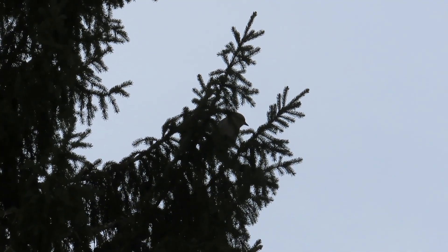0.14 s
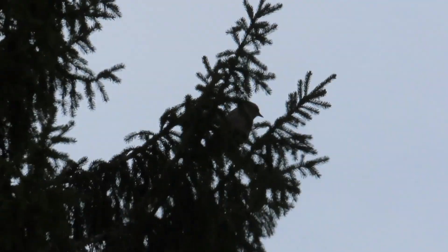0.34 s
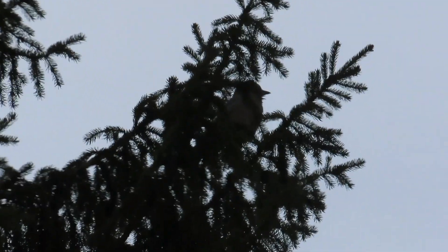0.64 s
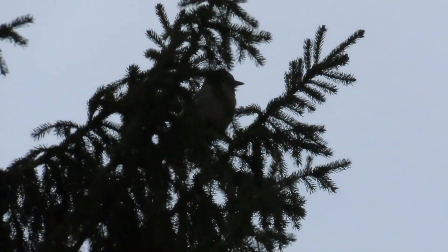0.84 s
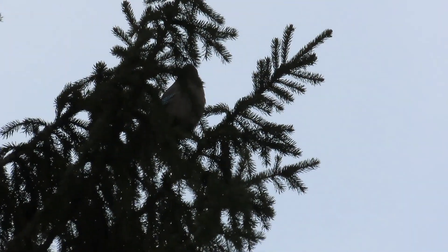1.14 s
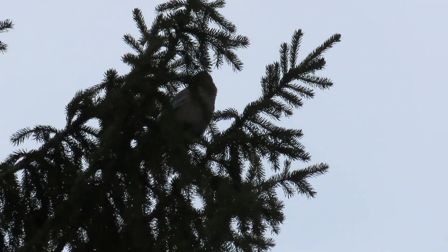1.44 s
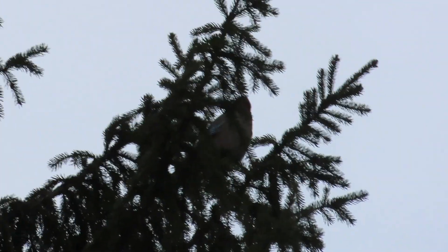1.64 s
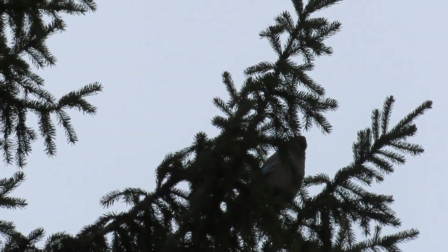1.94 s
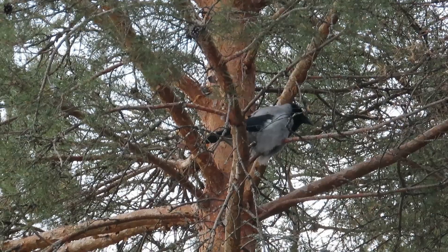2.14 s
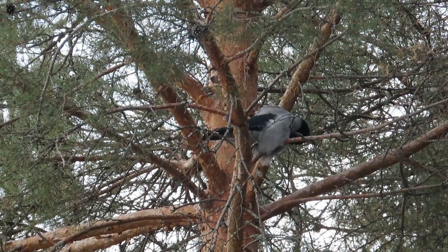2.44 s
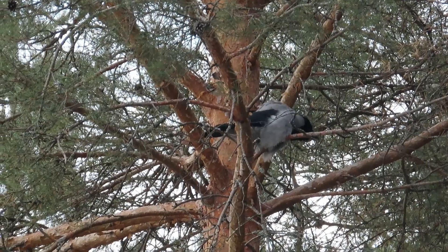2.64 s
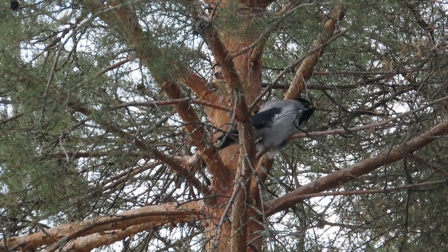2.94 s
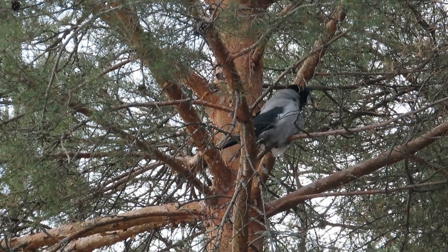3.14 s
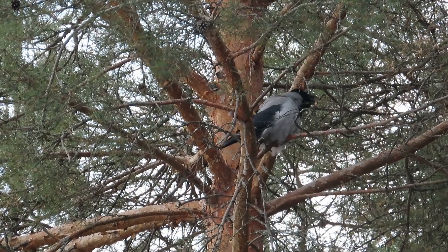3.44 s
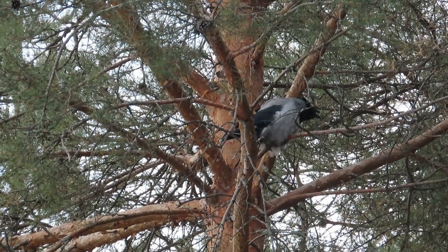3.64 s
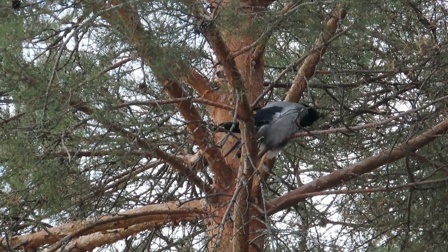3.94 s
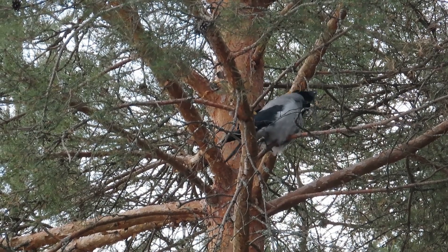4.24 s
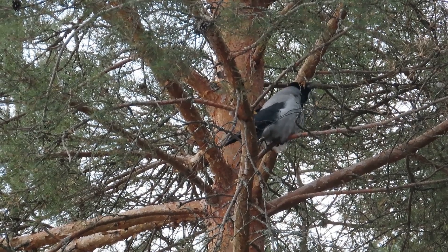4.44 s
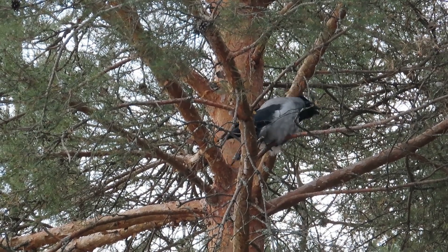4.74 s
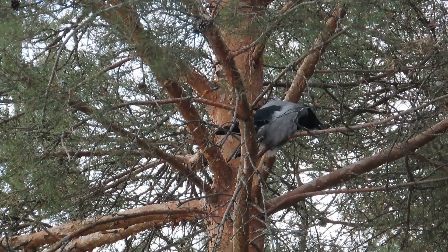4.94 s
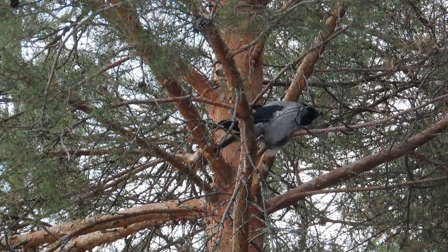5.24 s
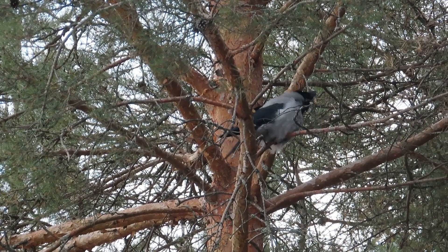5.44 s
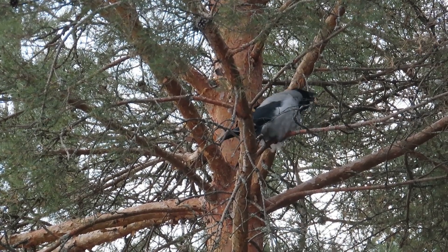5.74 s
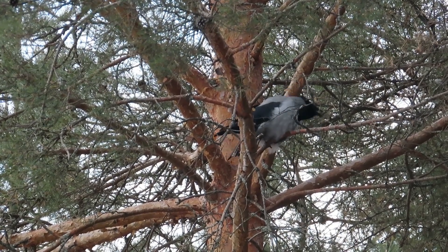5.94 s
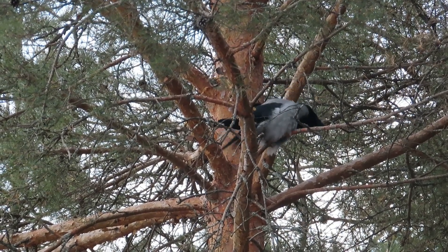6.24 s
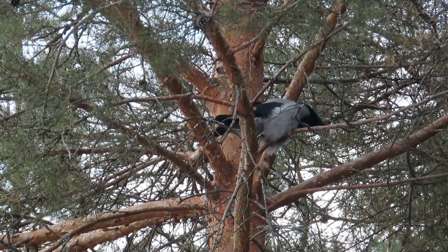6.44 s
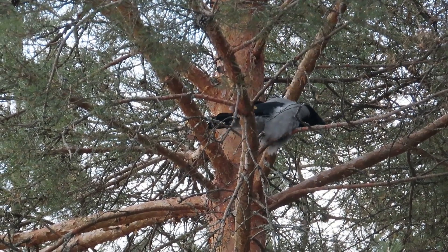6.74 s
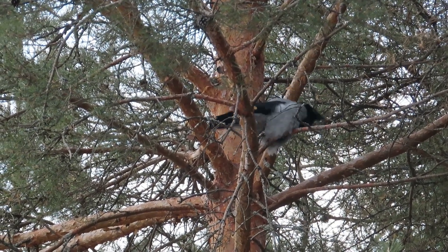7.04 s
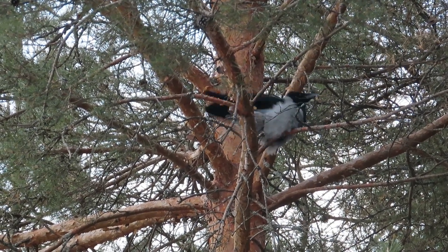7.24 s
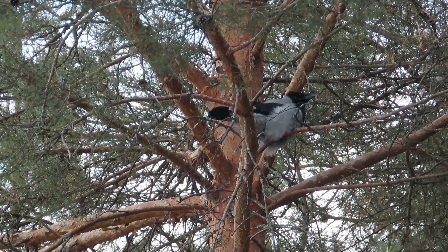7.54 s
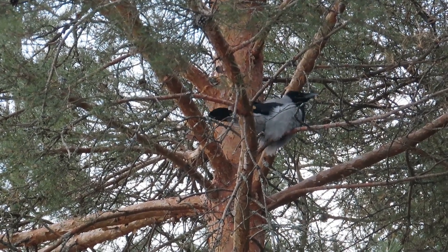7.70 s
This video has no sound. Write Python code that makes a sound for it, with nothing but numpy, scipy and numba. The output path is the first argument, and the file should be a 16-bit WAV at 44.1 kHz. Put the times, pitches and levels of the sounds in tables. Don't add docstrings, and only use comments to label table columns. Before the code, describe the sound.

Three harsh rattling crow caws over a low steady traffic rumble, with faint thin two-note whistles of a small bird in a conifer wood.

```python
import sys
import numpy as np
from scipy import signal
from scipy.fft import rfft, irfft, next_fast_len
from scipy.io import wavfile
from scipy.ndimage import uniform_filter1d
from numba import njit

SR = 44100
rng = np.random.default_rng(int(sys.argv[2]) if len(sys.argv) > 2 else 0)


def inscribe(sig):
    pcm = np.round(np.clip(np.atleast_2d(sig).T, -1, 1) * 32767)
    wavfile.write(sys.argv[1], SR, pcm.astype(np.int16))


def to_linear_factor(level_db):
    exponent = np.asarray(level_db, float) / 20
    return 10 ** exponent


N = 347067

# full voice in seconds, hold in seconds, level in dB, speed of the beak gesture.
CAWS = [
    (3.341, .55, -33.5, 0.96),
    (4.528, 0.55, -33.5, 0.95),
    (5.69, .59, -34, 1.22),
]
# seconds from full voice, beak opening 0-1, main throat resonance in Hz.
BEAK = [(-.035, .3, 960), (0, 0.71, 1133), (.05, 0.98, 1210), (.14, 1, 1350), (.21, .68, 1325),
        (.34, 0.28, 1235), (.6, 0.16, 1230)]
# seconds from start, period in ms.
FLAP_PERIOD = [(0, 17.8), (.17, 17.7), (.24, 15.6), (.35, 17.6), (.47, 20.4), (.68, 22)]
# centre in Hz, width in Hz.
OPEN_RING = (2500, 260)
# Hz with beak open, Hz closed, width in Hz.
CLOSED_RING = (2750, 3250, 200)
# Hz open, Hz closed, width in Hz, dB open, dB closed.
SLIDING_RINGS = [(916, 730, 238, -2, -11), (600, 478, 88, -8, -14), (1836, 1910, 250, -10.5, -37),
                 (1493, 1620, 175, -1, -34), (2050, 1760, 420, -12, -60)]
# centre in Hz, width in Hz, level in dB.
BREATH_BANDS = [(5300, 220, 8), (5470, 3400, 16), (6200, 300, 4), (4300, 600, 6), (8350, 4300, -8)]
# dB closed, dB open.
OPEN_RING_DB = (-38.5, -13)
CLOSED_RING_DB = (-20, -37.5)
BREATH_DB = (-49.5, -28.5)
# delay in ms, level in dB.
BOUNCES = [(17.7, -8.5), (4.4, -15)]
VOICE_HZ = 305.6
SCOOP_SHARE, SCOOP_S = .24, .014
ATTACK_S, ATTACK_DB, RELEASE_S, RELEASE_DB, SAG_DB_PER_S = .036, -27, .081, -23, -3.5

# start in seconds, level in dB, dB at the start of the slide, pitch ratio.
HIGH_NOTES = [
    (3.338, -55, -60, 1.04),
    (3.771, -51, -1.5, .995),
    (4.216, -48, -8, 1.001),
]
GRACE_NOTES = [
    (3.759, -53, -5, 1.001),
    (4.205, -52, -5, 1.001),
]
LOW_NOTES = [
    (3.51, -50, 0, 1),
    (3.935, -50, -1.5, 1.015),
    (4.387, -47, -2, 1.012),
]
# Hz from, Hz to, then slide middle, slide time, settling time and length in seconds.
HIGH_SHAPE = (7800, 4350, .013, 0.0051, 0.016, 0.11)
GRACE_SHAPE = (5800, 6800, .008, .004, .01, .019)
LOW_SHAPE = (5300, 3570, .034, 0.0061, 0.027, 0.166)
TIT_SETTLE_SHARE, TIT_EDGE_DB = .3, -17
TIT_ATTACK_S, TIT_RELEASE_S, TIT_HOOK_HZ = .008, .012, 350
TIT_PAN_DB, CROW_PAN_DB = -4.3, -1.5

# start in seconds, length in seconds, Hz at start, Hz at end, level in dB.
FAR_NOTES = [(1.123, 0.046, 4620, 4720, -68), (1.19, 0.13, 3060, 4050, -64.5),
             (1.33, 0.035, 2980, 2920, -64), (1.44, .025, 3700, 3200, -68), (1.488, 0.025, 3290, 3030, -61),
             (1.644, 0.045, 3130, 3940, -67), (1.715, 0.092, 4500, 4080, -66.5),
             (2.165, 0.04, 5600, 5130, -73), (2.45, .04, 4300, 4400, -69), (2.477, 0.079, 3080, 3170, -67),
             (2.866, 0.038, 1944, 1810, -53.5), (5.96, 0.051, 4350, 4220, -61.5),
             (5.982, .06, 3900, 3830, -68), (6.49, 0.058, 3050, 2900, -71), (6.551, 0.055, 6380, 6330, -73),
             (6.602, 0.075, 4680, 3900, -72), (6.754, 0.046, 923, 870, -61)]
FAR_BEND_SHARE = .72
WOOD_T60_S, WOOD_TOP_HZ, WOOD_RISE_S, WOOD_DB = 1.09, 4920, .0147, -13.5

# start in seconds, peak in dB, ring in Hz, decay (T60) in seconds.
TICKS = [
    (0.51, -34, 850, 0.016),
    (.513, -47, 1730, 0.045),
    (0.601, -41, 840, 0.032),
    (.812, -52, 5300, 0.034),
    (1.269, -38.5, 795, 0.056),
    (7.535, -58, 13000, .01),
]
# centre in Hz, width in Hz, peak in dB.
HOUSING = (852, 227, 6.5)

# Hz, dB per Hz.
COLOUR_1 = [(15, -44), (25, -13), (43, -17), (59, -6), (77, -3.5), (93, -10), (113, -4), (198, -5),
            (227, -1), (614, -17), (871, -18), (1410, -24.5), (4150, -31), (15500, -49)]
COLOUR_2 = [(15, -55), (25, -23), (55, -15.5), (122, -2), (215, 0), (378, -10.5), (445, -18.5),
            (762, -26.5), (895, -19), (1020, -27), (1850, -31), (2010, -32), (4260, -36.5), (15500, -54)]
# Hz, dB.
SIDE_1 = [(60, -20), (110, -11.5), (200, -13.5), (380, -4), (700, -13), (1290, -5.5), (2380, -3),
          (4400, -7), (8120, -7.5), (15000, -3)]
SIDE_2 = [(60, -23), (110, -17), (200, -22.5), (380, -5), (700, -9.5), (1290, -2.5), (2380, -1), (4400, -3),
          (8120, -5.5), (15000, -4)]
TRAFFIC = [(0, -57.5), (.08, -53), (.3, -55.5), (.5, -60.5), (.86, -62), (1.05, -52.5), (1.35, -51),
           (1.93, -53.5)]
ROAD = [(2.1, 1), (2.6, -0.5), (4.2, 2.2), (6.4, -0.6), (7.2, 2.5), (7.87, 0)]
# Hz, share.
TRAFFIC_SHARES = [(420, -0.029), (650, 0.8), (1000, 1), (2000, -0.065)]
ROAD_SHARES = [(500, -0.16), (1900, 0.91), (5000, -0.11)]
BACKGROUND_1_DB, BACKGROUND_2_DB = -43.5, -40
DRONE_HZ, DRONE_RISE_HZ_PER_S, DRONE_DB, DRONE_RISE_DB_PER_S = 61, 1.24, -53, 1.4

CUT_S, START_S, FADE_S = 1.939, 2.072, .045
MIC_TOP_HZ = 12800


def level(x, db):
    return x * to_linear_factor(db) / np.sqrt(np.mean(x ** 2))


def walk(rate_hz, size):
    place = np.arange(size) * rate_hz / SR
    k, part = place.astype(int), place % 1
    part = part * part * (3 - 2 * part)
    levels = rng.standard_normal(size // 64)
    return 1.193 * (levels[k] * (1 - part) + levels[k + 1] * part)


@njit
def bandpass(x, hz, width_hz):
    y, band, low = np.empty(len(x)), 0., 0.
    for i in range(len(x)):
        g, k = np.tan(np.pi * hz[i] / SR), width_hz / hz[i]
        v = (band + g * (x[i] - low)) / (1 + g * (g + k))
        band, low, y[i] = 2 * v - band, low + 2 * g * v, k * v
    return y


def ring(x, hz, width_hz):
    hz = hz + np.zeros(len(x))
    return bandpass(bandpass(x, hz, 1. * width_hz), hz, 1. * width_hz)


def add(track, x, s):
    i = int(s * SR)
    track[..., i:i + x.shape[-1]] += x[..., :N - i]


def membrane(t, beak):
    size, since = len(t), t - t[0]
    period_s = np.interp(since, *np.transpose(FLAP_PERIOD)) / 1000
    flap = np.cumsum((1 + .014 * walk(40, size)) / period_s) / SR
    scoop = SCOOP_SHARE * np.exp((.024 - since) / SCOOP_S).clip(0, 1)
    pitch = 1 - scoop + .008 * walk(30, size) + .035 * walk(250, size)
    turn = np.floor(np.cumsum(VOICE_HZ * pitch) / SR)
    free = np.diff(turn, prepend=0) * (1 + .25 * (-1) ** turn)
    burst = 6.5 * (.45 * (flap % 1) + .55 * (flap % 1) ** 2) + .03 * walk(200, size)
    locked = np.abs(np.sign(np.diff(np.floor(burst), prepend=0)))
    share = np.clip(1 - (since - .07) / .1, .08, 1)
    pulses = np.sqrt(share) * level(free, 0) + np.sqrt(1 - share) * level(locked, 0)
    depth = .3 + .25 * (1 - beak)
    gate = (1 - depth * np.cos(2 * np.pi * flap)) * to_linear_factor(1.2 * walk(60, size))
    return gate * (pulses + .2 * rng.standard_normal(size)), gate, flap


def throat(source, t, beak, main_hz, flap):
    saw = uniform_filter1d(flap % 1 - .5, size=100)
    sweep = 1 + (.11 + .09 * (1 - beak)) * saw
    body = ring(source, main_hz * sweep, 275)
    wake = np.clip((t - t[0] - .03) / .03, .1, 1)
    for k, (open_hz, shut_hz, width_hz, open_db, shut_db) in enumerate(SLIDING_RINGS):
        hz = (shut_hz + (open_hz - shut_hz) * beak) * sweep
        gain = wake * to_linear_factor(shut_db + (open_db - shut_db) * beak)
        body = body - (-1) ** k * gain * ring(source, hz, width_hz)
    return body / np.sqrt(uniform_filter1d(body ** 2, size=3000))


def caw(hold_s, level_db, speed):
    t = np.arange(-ATTACK_S, hold_s + RELEASE_S, 1 / SR)
    corners_s = [-ATTACK_S, 0, hold_s, hold_s + RELEASE_S]
    db = level_db + SAG_DB_PER_S * t + np.interp(t, corners_s, [ATTACK_DB, 0, 0, RELEASE_DB])
    s, opening, throat_hz = np.transpose(BEAK)
    beak = np.clip(np.interp(t * speed, s, opening), 0, 1)
    main_hz = np.interp(t * speed, s, throat_hz)
    source, gate, flap = membrane(t, beak)
    body = throat(source, t, beak, main_hz, flap)

    open_hz, shut_hz, width_hz = CLOSED_RING
    upper_hz = shut_hz + (open_hz - shut_hz) * np.clip(1.86 * beak - .6, 0, 1)
    upper = level(ring(source, upper_hz, width_hz), .73)
    fixed = level(ring(source, *OPEN_RING), 0)
    noise = gate * rng.standard_normal(len(t))
    breath = level(sum(to_linear_factor(d) * ring(noise, f, w) for f, w, d in BREATH_BANDS), 7.0)

    fixed_gain, upper_gain, breath_gain = (
        to_linear_factor(shut + (wide - shut) * beak) for shut, wide in (OPEN_RING_DB, CLOSED_RING_DB, BREATH_DB))
    voice = body + fixed_gain * fixed + upper_gain * upper
    voice = voice / np.sqrt(.75 + uniform_filter1d(voice ** 2, size=90) / 4)
    return to_linear_factor(db) * (voice + breath_gain * breath)


def crow_calls():
    out = np.zeros(N)
    for s, hold_s, db, speed in CAWS:
        voice = caw(hold_s, db, speed)
        for delay_ms, path_db in [(0, -1.0)] + BOUNCES:
            add(out, to_linear_factor(path_db) * voice, s - ATTACK_S + delay_ms / 1000)
    return out


def whistle(shape, db, ratio=1, flutter=0):
    s, hz, shape_db = np.transpose(shape)
    t = np.arange(0, s[-1], 1 / SR)
    hz = uniform_filter1d(np.interp(t, s, hz), size=200) * ratio
    hz = hz * (1 + .012 * flutter * walk(89, len(t)))
    gain = to_linear_factor(db + np.interp(t, s, shape_db) + 3 * flutter * walk(70, len(t)))
    return np.sqrt(2) * gain * np.sin(2 * np.pi * np.cumsum(hz) / SR)


def tit_shape(from_hz, to_hz, middle_s, slide_s, settle_s, length_s, start_db):
    t = np.arange(0, length_s, 1 / 2000)
    done = 1 / (1 + np.exp((middle_s - t) / slide_s))
    settled = done * (1 - TIT_SETTLE_SHARE * np.exp(-np.maximum(t - middle_s, 0) / settle_s))
    onset = np.maximum(1 - t / TIT_ATTACK_S, 0)
    ending = np.maximum(1 - (length_s - t) / TIT_RELEASE_S, 0)
    hz = from_hz + (to_hz - from_hz) * settled - TIT_HOOK_HZ * onset
    return np.transpose([t, hz, start_db * (1 - done) + TIT_EDGE_DB * (onset + ending)])


def tit_song():
    out = np.zeros(N)
    for kind, notes in (HIGH_SHAPE, HIGH_NOTES), (GRACE_SHAPE, GRACE_NOTES), (LOW_SHAPE, LOW_NOTES):
        for s, db, start_db, ratio in notes:
            add(out, whistle(tit_shape(*kind, start_db), db, ratio, flutter=.32), s)
    return out


def far_birds():
    out = np.zeros(N)
    for s, length_s, hz0, hz1, db in FAR_NOTES:
        middle_hz = hz0 + FAR_BEND_SHARE * (hz1 - hz0)
        shape = [(0, hz0, -12), (.15 * length_s, hz0, 0), (length_s / 2, middle_hz, 0),
                 (.85 * length_s, hz1, 0), (length_s, hz1, -12)]
        add(out, whistle(shape, db, flutter=.92), s)
    return out


def trees(x):
    t = np.arange(SR) / SR
    mid, side = rng.standard_normal((2, SR))
    envelope = np.exp(-np.log(1000) * t / WOOD_T60_S) * (1 - np.exp(-t / WOOD_RISE_S))
    tail = np.array([mid + .57 * side, mid - .14 * side]) * envelope
    tail = signal.sosfilt(signal.butter(1, WOOD_TOP_HZ, fs=SR, output="sos"), tail)
    return signal.fftconvolve(x[None], tail / np.sqrt(np.sum(tail ** 2) / 2), axes=1)[:, :N]


def camera_ticks():
    out, t = np.zeros(N), np.arange(4000) / SR
    for s, db, hz, t60_s in TICKS:
        crack = .6 * np.exp(-t / .0028) * ring(rng.standard_normal(len(t)), hz, hz)
        tone = np.exp(-np.log(1000) * t / t60_s) * np.sin(2 * np.pi * hz * t)
        add(out, to_linear_factor(db) * (tone + crack), s)
    return out


def engine_drone():
    t = np.arange(int(CUT_S * SR)) / SR
    hz = (DRONE_HZ + DRONE_RISE_HZ_PER_S * t) * (1 + .019 * walk(12.8, len(t)))
    gain = to_linear_factor(DRONE_DB + DRONE_RISE_DB_PER_S * t + .83 * walk(6.17, len(t)))
    return np.sqrt(2) * gain * np.sin(2 * np.pi * np.cumsum(hz) / SR)


def read(table, hz):
    table_hz, value = np.transpose(table)
    return np.interp(np.log(hz + 1), np.log(table_hz), value)


def swell(curve, shares):
    s, db = np.transpose(curve)
    return lambda t, hz: read(shares, hz) * np.interp(t, s, db - np.mean(db))


def traffic(s0, s1, colour, side, db, swell_db, flicker_db):
    length = int((s1 - s0) * SR)
    size = next_fast_len(length)
    t, hz = s0 + np.arange(size) / SR, np.arange(size // 2 + 1) * SR / size
    body_hz, width_hz, peak_db = HOUSING
    gain = to_linear_factor(read(colour, hz) + peak_db / (1 + (2 * (hz - body_hz) / width_hz) ** 2))
    mid = gain * rfft(rng.standard_normal(size))
    wide = gain * rfft(rng.standard_normal(size)) * to_linear_factor(read(side, hz))
    out = 0
    for step in np.arange(9, 29):
        share = np.cos(np.pi / 2 * np.clip(2 * np.log2(hz + 1) - step, -1, 1)) ** 2
        m, d = irfft(share * mid, size), irfft(share * wide, size)
        band_gain = to_linear_factor(swell_db(t, 2 ** (step / 2)) + flicker_db * walk(9, size))
        out = out + band_gain * np.array([m + d, m - d])
    return level(out, db)[:, :length]


def scene():
    crow, tit, far = crow_calls(), tit_song(), far_birds()
    echo = trees(.66 * crow + 1.3 * tit + 1.7 * far)
    side = np.array([[.5], [-.5]])
    out = crow * to_linear_factor(CROW_PAN_DB * side) + tit * to_linear_factor(TIT_PAN_DB * side) + 1.23 * far
    out = out + to_linear_factor(WOOD_DB) * echo + camera_ticks()
    first = traffic(0, CUT_S, COLOUR_1, SIDE_1, BACKGROUND_1_DB, swell(TRAFFIC, TRAFFIC_SHARES), .86)
    second = traffic(START_S, N / SR, COLOUR_2, SIDE_2, BACKGROUND_2_DB, swell(ROAD, ROAD_SHARES), 1.0)
    add(out, first + engine_drone(), 0)
    add(out, second, START_S)
    return out


def roll_off(x):
    return signal.sosfilt(signal.butter(12, 15660, fs=SR, output="sos"), x)


def record(dry):
    t = np.arange(N) / SR
    splice = (t < CUT_S) + np.clip((t - START_S) / FADE_S, 0, 1) ** 3.3
    heard = signal.sosfilt(signal.butter(3, MIC_TOP_HZ, fs=SR, output="sos"), dry)
    return roll_off(heard * splice)


dry = scene()
out = record(dry)
inscribe(out)
```